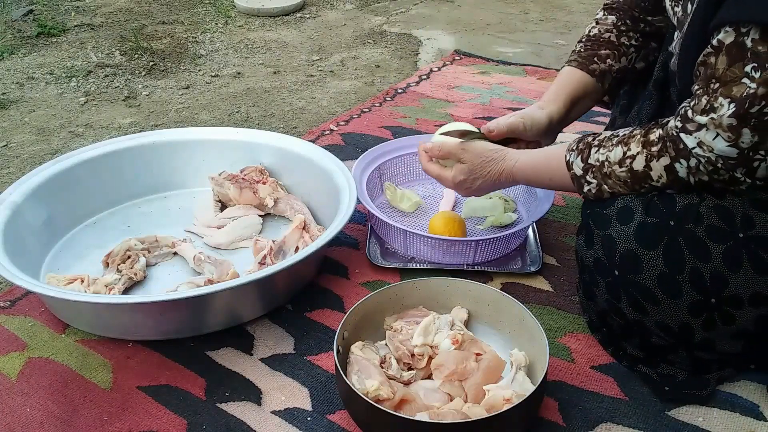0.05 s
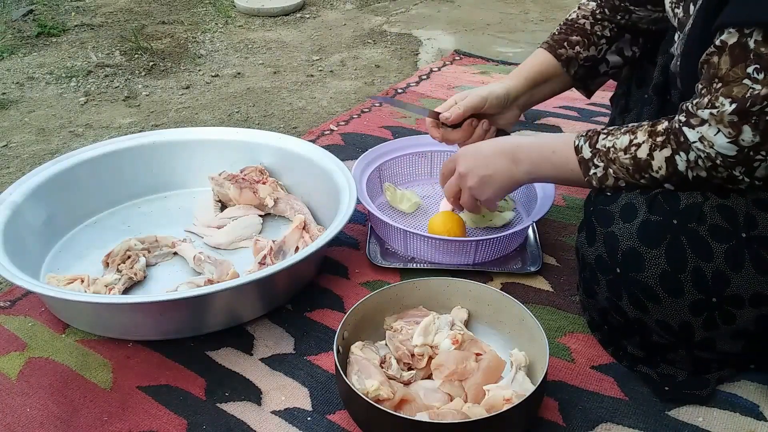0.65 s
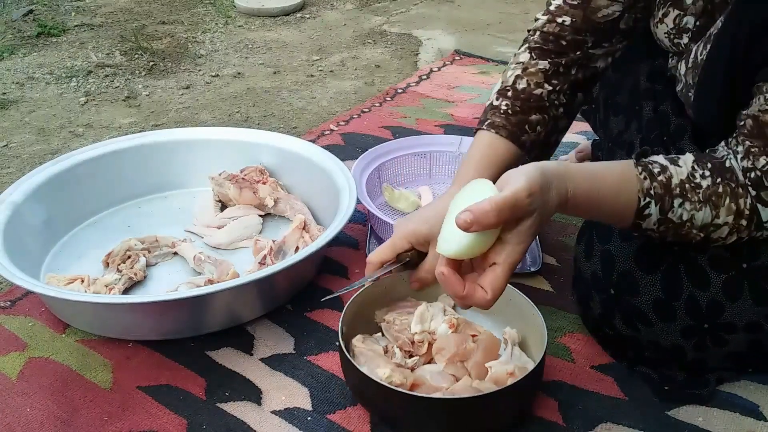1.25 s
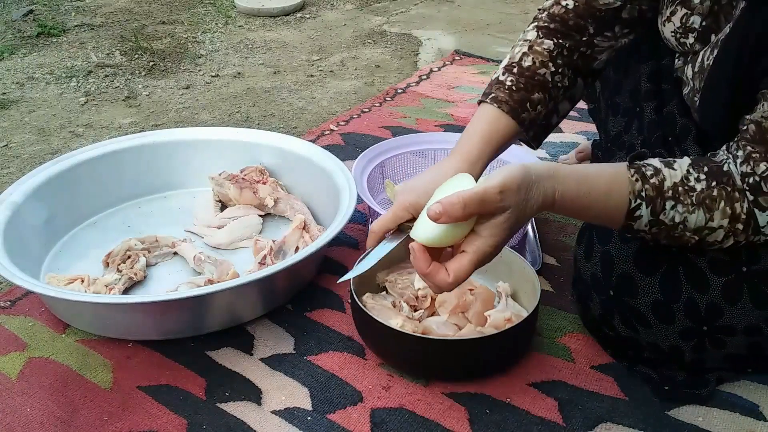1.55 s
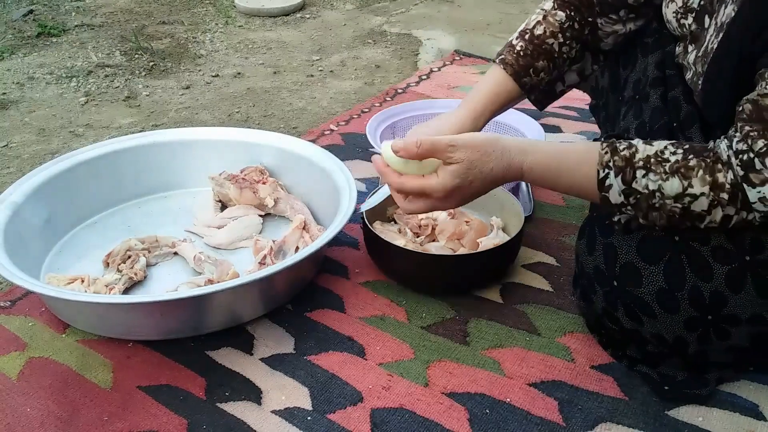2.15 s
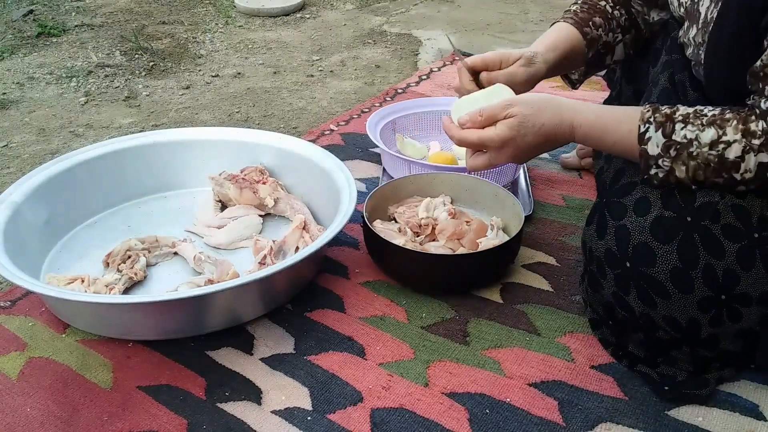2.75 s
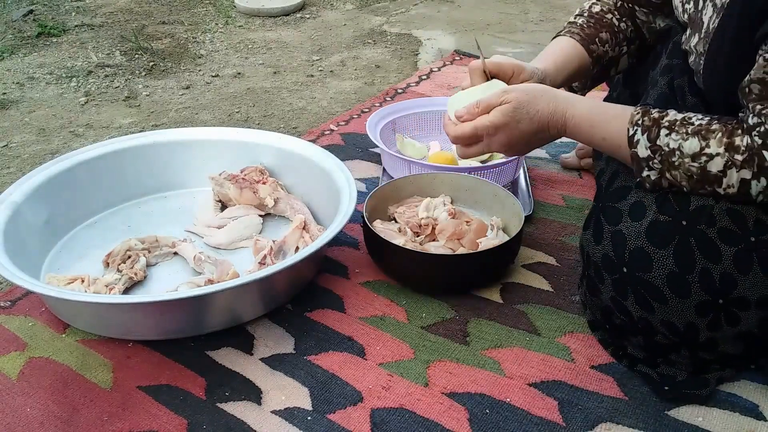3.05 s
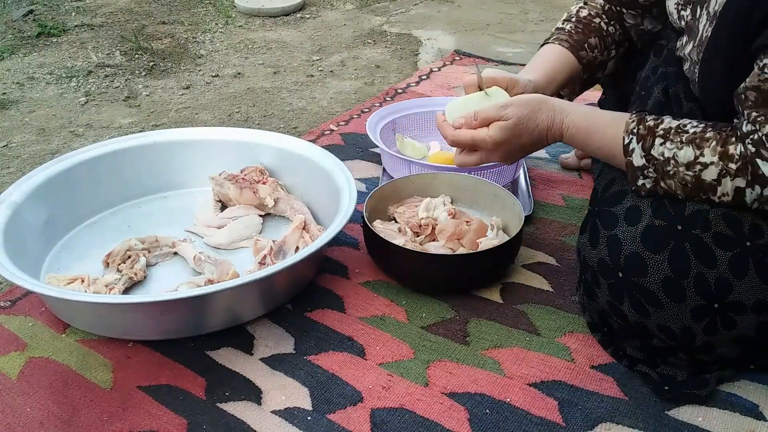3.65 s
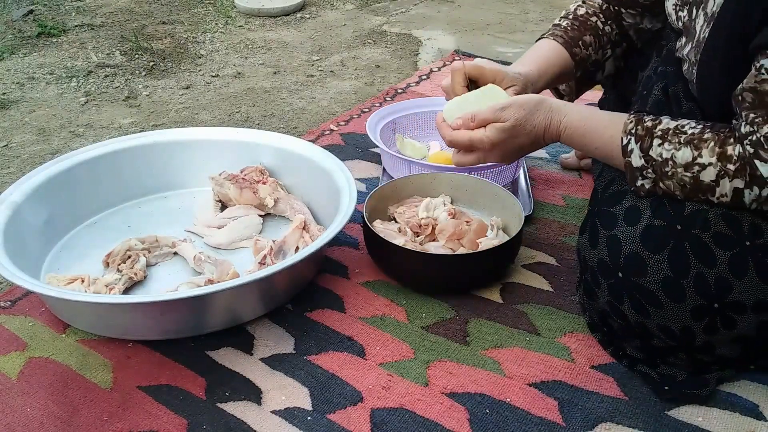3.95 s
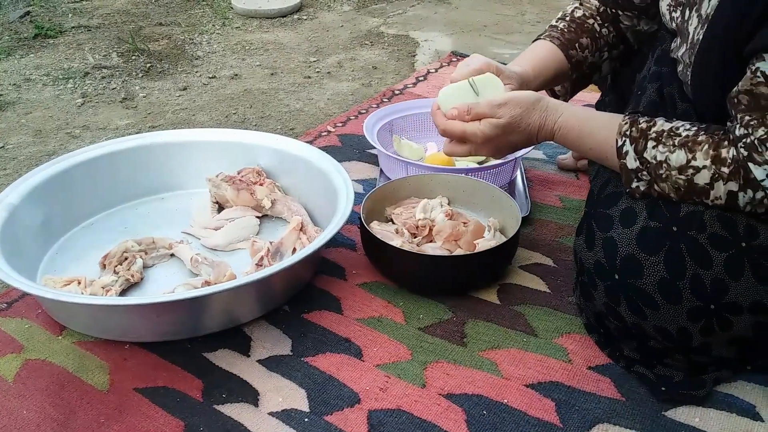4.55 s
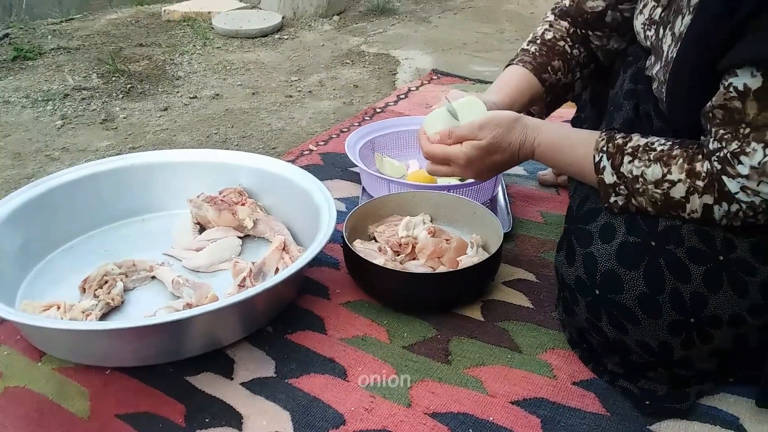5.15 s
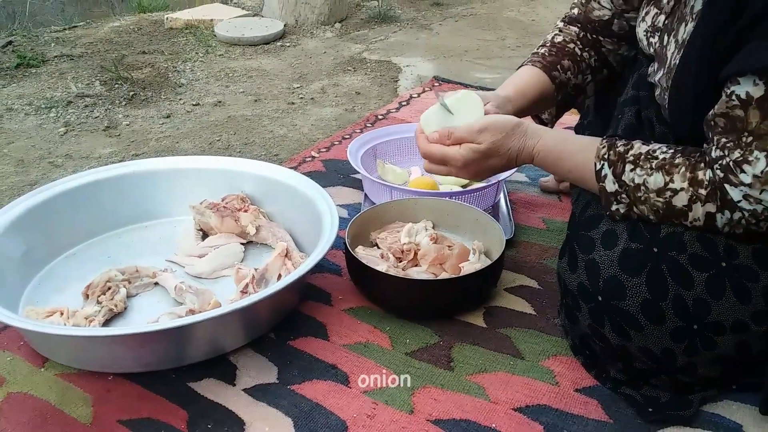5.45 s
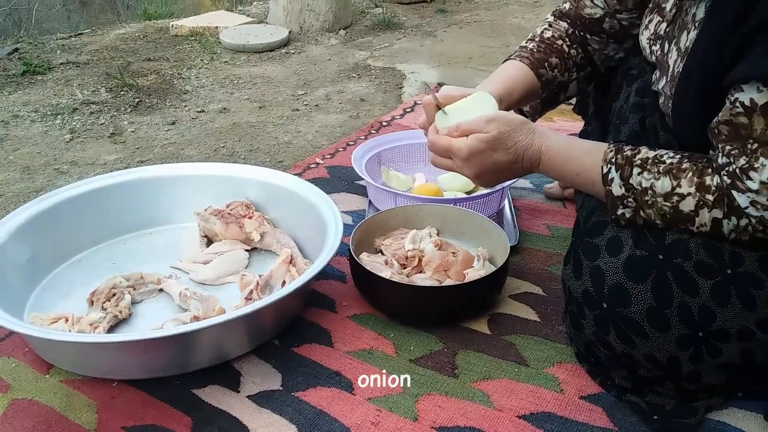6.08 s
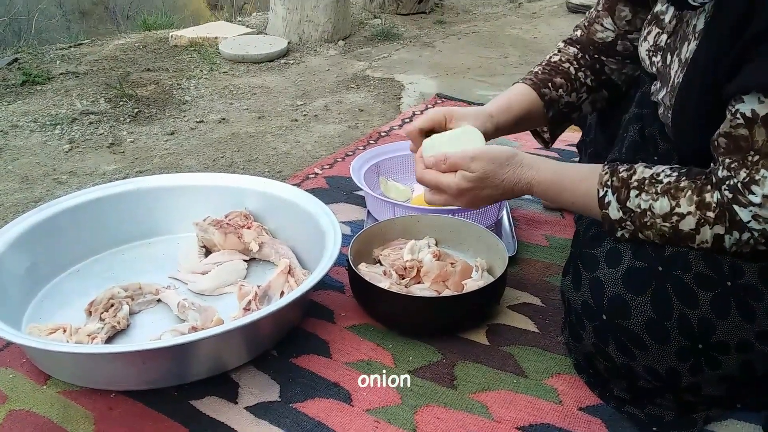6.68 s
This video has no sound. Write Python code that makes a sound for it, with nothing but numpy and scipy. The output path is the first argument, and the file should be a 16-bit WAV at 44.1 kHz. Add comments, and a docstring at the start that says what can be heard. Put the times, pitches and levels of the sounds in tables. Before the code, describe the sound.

The setting is a quiet yard with a faint low murmur of air, a very thin high whine and almost no echo. At about 0.7 seconds, several onion pieces drop into a plastic colander with light, wet, hollow taps. From 1.2 to 2.2 seconds, a loaded pot is dragged over a rug, hissing and rumbling softly, with one dry knock at 1.6 seconds, the loudest sound. Around 2.3 seconds, a knife clatters and skids on the rim of a metal basin, ringing briefly. Then the knife cuts a hand-held onion in five short, crisp, uneven strokes, at about 3.1, 3.6, 4.1, 5.0 and 6.1 seconds. Each is a soft, juicy crunch of layers giving way, the last one a little longer and brighter. Small blade ticks and faint rubbing of fingers fall between the strokes, with a final tick near 6.7 seconds.

```python
"""A knife cuts a hand-held onion in five crisp, lurching strokes: cells burst in crowds as each layer
gives way, and the wet blade rubs and ticks. Before the strokes, pieces drop into a plastic colander,
a loaded pot is dragged over a rug and knocks, and the knife clatters on the metal rim of a basin.
Fracture and friction are modelled as filtered random impulses, ringing bodies as sums of damped modes.
The quiet yard adds a faint echo, a low murmur of air and a thin high whine."""
import sys
import numpy as np
from scipy import signal
from scipy.fft import rfft, irfft
from scipy.io import wavfile

SR = 44100
rng = np.random.default_rng(int(sys.argv[2]) if len(sys.argv) > 2 else 0)


def int16_out(signal):
    """Quantize to a 16-bit WAV file."""
    q = np.round(np.clip(np.atleast_2d(signal).T, -1, 1) * 32767)
    wavfile.write(sys.argv[1], SR, q.astype(np.int16))


N = 305172
T = np.arange(N) / SR

# modes of the basin's rim: pitch_hz, level_db, t60_s
RIM_MODES = [(754, -28, .22), (969, -14, .16), (1034, -5, .11), (1155, -5, .07), (1268, -7, .09),
             (1455, -7, .06), (1554, 0, .155), (1873, -23, .15), (2146, -11, .14), (2254, -14, .13),
             (2429, -4, .1), (2625, -9, .08), (2718, -6, .09), (2972, -6, .08), (3422, -4, .05),
             (3785, -9, .04), (4055, -6, .05), (4107, -6, .05), (4340, -8, .04), (4670, -6, .03),
             (5093, -13, .035), (5480, -11, .04), (6040, -11, .04), (6345, -15, .035), (7560, -19, .03)]
# spectrum of steel meeting the rim: frequency_hz, level_db
STEEL_SPECTRUM = [(200, -27.5), (420, -5), (800, -24.5), (1000, -8.5), (1500, -0.5), (1900, -10),
                  (2700, -4.5), (3600, -2.5), (4500, -3), (5600, -7.5), (7500, -12.5), (9500, -37.5),
                  (12500, -27.5), (16000, -31)]


def onion():
    """Brittle fracture: cells burst loudly at each lurch and on through the glide; wet surfaces rub."""
    # knife strokes: touch_s, first_s, last_s, lurch_count, slowing_ratio, rub_db, first_db, rise_db,
    # full_db, last_db, half_length_s, glide_db, final_brightness_db,
    # then the slit's two resonances: low_hz, low_boost_db, high_hz, high_boost_db
    strokes = [(3.063, 3.07, 3.223, 5, .13, -78, -62.5, 5.2, -49, -44, .0135, -14, -2, 2936, 16, 5990, 3),
               (3.575, 3.581, 3.699, 5, .14, -70, -60.5, 11, -47, -50.5, .014, -13, -4, 3110, 9, 6300, 0),
               (4.0, 4.081, 4.211, 4, .13, -55, -48.5, 4, -44, -37, .0085, -23, -1, 3130, 5.5, 4620, 2),
               (4.922, 4.943, 5.124, 5, .1, -66, -56.5, 4.8, -43, -45, .0105, -23, 5, 1580, 6, 4720, 4),
               (5.932, 6.009, 6.233, 6, .26, -56.5, -57, 5.3, -39, -39.5, .0068, -24, 8, 1977, 11.5, 4370, -1.5)]
    # spectrum of bursting cells: frequency_hz, level_db
    crunch_spectrum = [(300, -20), (900, -32), (1300, -21), (1900, -12), (2400, -9), (3000, -3), (4600, 5),
                       (6300, 3.5), (7700, -5), (9000, -22.5), (10500, -27), (12500, -18), (15500, -13.5)]
    # peaks and dips of the cupped hand: centre_hz, width_hz, boost_db
    hand_peaks = [(2450, 250, -5), (3340, 370, 1), (3880, 340, -8), (4300, 590, 1.5), (5400, 440, -12.5),
                  (6200, 840, 2.5), (6730, 270, -9)]
    # spectrum of rubbing on the onion: frequency_hz, level_db
    rub_spectrum = [(200, -18.5), (500, -4), (780, -24), (1200, 7), (1550, -4), (2050, 11.5), (2550, -4),
                    (3100, -1.5), (4300, 1), (7200, -2), (9000, -41), (15500, -18)]
    # the rubbing's hollow peaks and dips: centre_hz, width_hz, boost_db
    rub_peaks = [(1150, 160, -5.5), (2050, 660, -2), (3000, 190, 11.5), (3580, 300, -3), (4220, 350, 3.5)]
    # fingers shifting on the onion: centre_s, level_db, half_length_s, brightness_db
    finger_shifts = [(0.303, -65.5, 0.015, -25), (0.93, -73.5, 0.051, 17), (2.62, -72.5, 0.09, 23),
                     (3.368, -66, 0.015, 21), (3.885, -73, .042, -19), (4.56, -75, .042, 9.5),
                     (6.631, -63, .025, 30)]
    # the blade set down or breaking through: start_s, level_db, brightness_db, resonance_hz
    blade_taps = [(3.538, -49, 15, 3100), (3.8265, -39.5, 15.5, 6800), (3.8297, -22.5, 9, 900),
                  (4.116, -39.5, -13, 336), (4.4332, -33, 11.5, 258), (4.5242, -39, 3.5, 280),
                  (4.7613, -32, -32, 1283), (5.217, -48, 17, 6090), (5.616, -37.5, 5.5, 481),
                  (5.934, -38.5, -18, 283), (6.573, -46.5, 4.5, 281), (6.7313, -32.5, -1, 3110)]
    # rows of cells give way together, in clumps of a few ms
    bursts = rms_one(grains(per_s=9000, spread_db=1.0) * from_db(1.4 * drift(450)))
    rubbing = convolve(grains(per_s=6000, spread_db=2.5), response(rub_spectrum, rub_peaks))
    blade = rms_one(brighten(rubbing, -17)) * from_db(1.2 * drift(70))
    out = swells(finger_shifts, rubbing) + strikes(blade_taps, tick)
    for (touch_s, first_s, last_s, count, slowing, rub_db, first_db, rise_db, full_db, last_db,
         half_s, glide_db, bright_db, low_hz, low_db, high_hz, high_db) in strokes:
        slit_peaks = [(low_hz, 580, low_db), (high_hz, 600, high_db)]
        cells = convolve(bursts, response(crunch_spectrum, hand_peaks + slit_peaks))
        slips = lurches(first_s, last_s, count, slowing, first_db, rise_db, full_db, last_db,
                        half_s, bright_db)
        force_db = np.interp(T, slips[:, 0], slips[:, 1])
        glide_s = last_s - first_s + 0.026  # the blade follows through after the last lurch
        glide = from_db(force_db + glide_db) * envelope(first_s, glide_s, release_db_per_s=206)
        # the flat of the blade rubs less as the slit opens
        rub = from_db(rub_db) * envelope(touch_s, hold_s=0.059, release_db_per_s=86)
        out += swells(slips, cells, edge_power=3.4, rise_s=0.0061) + glide * cells + rub * blade
    return out


def lurches(first_s, last_s, count, slowing, first_db, rise_db, full_db, last_db,
            half_s, final_bright_db, entry_bright_db=-11.5, stretch=1.36):
    """Stick-slip: the blade breaks layer after layer, each slip longer and brighter as it sinks."""
    layer = np.arange(count)
    depth = layer / layer[-1]
    centre_s = first_s + (last_s - first_s) * depth * (1 - slowing * (1 - depth))
    level_db = np.append(np.minimum(first_db + rise_db * layer[:-1], full_db), last_db)
    half_lengths_s = half_s * stretch ** (depth - .5)
    bright_db = entry_bright_db + (final_bright_db - entry_bright_db) * depth
    return np.column_stack([centre_s, level_db, half_lengths_s, bright_db])


def tick(body_hz, onion_lowest_hz=230):
    """Impulse excitation: a tap of the blade is coloured by the resonance of the part it meets."""
    # spectrum of the tap: frequency_hz, level_db
    tap_spectrum = [(30, -27), (90, -2), (200, 4), (420, 0), (1040, -16.5), (1900, -10.5), (2600, -14),
                    (3500, -11), (4600, -16), (7100, -17.5), (9500, -53), (14000, -40)]
    tap = blow(tap_spectrum, [(body_hz, 0.44 * body_hz, 6)],
               scatter_db=-18.5, scatter_t60=0.02, tail_db=-35, tail_t60=0.21)
    return high_pass(tap, edge_hz=min(0.31 * body_hz, onion_lowest_hz))


def colander(hop_s=0.024, hop_loss_db=11):
    """Inelastic collision: each piece of onion lands and hops twice, weaker each time."""
    # falling pieces: start_s, level_db, brightness_db
    pieces = [(0.7072, -40.5, -26), (0.7245, -33.5, -20), (0.7925, -44, 5), (0.7962, -29.5, 28),
              (0.8162, -37, 0), (0.854, -35, 8), (0.912, -49, 16)]
    contacts = [(start_s + hop_s * hop, level_db - hop_loss_db * hop, bright_db)
                for start_s, level_db, bright_db in pieces for hop in range(3)]
    return strikes(contacts, landing)


def landing():
    """Modal ringing: the wet snap of a piece sets the hollow plastic vibrating."""
    # spectrum of the snap: frequency_hz, level_db
    snap_spectrum = [(100, 0), (250, 9), (480, 13.5), (900, -1), (1450, 3.5), (2400, -4), (3200, 3.5),
                     (5400, 1.5), (7200, -0.5), (9200, -29.5), (15000, -17)]
    # modes of the colander: pitch_hz, level_db, t60_s
    plastic_modes = [(190, -1.5, 0.18), (440, -7, .09), (531, -1, 0.19), (1106, -2, 0.12),
                     (1440, -4.5, 0.2), (1900, -10, 0.11), (3170, 2, 0.086), (3660, 4, 0.035)]
    snap = blow(snap_spectrum, [], scatter_db=-6, scatter_t60=0.022, tail_db=-9, tail_t60=0.1)
    return snap + from_db(-22) * ring(plastic_modes)


def pot():
    """Sliding friction: the base hisses and catches on the rug, sings and rumbles under its load."""
    # the drag before the loudest knock: time_s, friction_db, singing_db, rumble_db
    pull = [(1.12, -83, -98, -78), (1.206, -53, -54.5, -73), (1.29, -43, -42.5, -58),
            (1.336, -42.5, -49.5, -61), (1.428, -44.5, -49.5, -50.5), (1.444, -45.5, -53, -55),
            (1.52, -45, -51, -57.5), (1.572, -44.5, -46.5, -55.5), (1.595, -43, -50.5, -48)]
    # the drag after it: time_s, friction_db, singing_db, rumble_db
    slide = [(1.69, -45.5, -52, -53.5), (1.728, -49.5, -56, -60.5), (1.994, -47, -56, -55),
             (2.074, -49, -53, -61), (2.098, -49.5, -57, -50), (2.18, -53.5, -61.5, -61),
             (2.215, -68, -75.5, -63.5)]
    # hiss of the rug's weave: frequency_hz, level_db
    weave_spectrum = [(500, -22), (900, -11), (1700, -1), (2300, -4), (2620, -4.5), (3200, 3), (4200, -3.5),
                      (5200, -1.5), (7400, -4.5), (8400, -13.5), (9400, -29.5), (10800, -27), (12300, -22),
                      (15500, -25.5)]
    # resonances of the pot's wall: centre_hz, width_hz, boost_db
    wall_peaks = [(1800, 150, 2.5), (3250, 480, -2), (5242, 300, 1.5), (7330, 170, 1.5)]
    # grit catching under the pot: centre_s, level_db, half_length_s, brightness_db
    catches = [(1.345, -47, 0.0075, 0), (1.445, -47, 0.0042, 24), (1.585, -43, 0.0076, -13),
               (1.807, -43.5, 0.0041, -14), (1.962, -49, 0.013, 22), (2.174, -48.5, 0.0063, 2.5)]
    # singing of the base: frequency_hz, level_db
    base_spectrum = [(600, -36.5), (1050, -17.5), (1230, 0.5), (1420, 6.5), (1600, -11), (2400, -41)]
    # rumble of the loaded pot: frequency_hz, level_db
    rumble_spectrum = [(25, -28), (60, -17.5), (130, 1.5), (240, 4), (330, -3.5), (450, 3), (650, -4),
                       (900, -4.5), (1300, -18), (3000, -44.5)]
    # knocks as the pot moves: start_s, level_db, brightness_db
    bumps = [(1.42, -41, -20), (1.6192, -1, -8), (1.652, -30.5, 1.5), (2.104, -33.5, -23.5)]
    time_s, *levels_db = np.transpose(np.vstack([pull, slide]))
    friction, singing, load = (from_db(np.interp(T, time_s, db, left=-120, right=-120))
                               for db in levels_db)
    scrape = response(weave_spectrum, wall_peaks)
    hiss = convolve(grains(per_s=11000, spread_db=1.0), scrape) * from_db(0.8 * drift(90))
    grit = swells(catches, convolve(grains(per_s=2100, spread_db=2.0), scrape))
    base = convolve(rng.standard_normal(N), response(base_spectrum)) * from_db(-1 + 2.4 * drift(25))
    rumble = convolve(grains(per_s=2500, spread_db=1.5), response(rumble_spectrum)) * from_db(-1.5)
    return friction * hiss + grit + singing * base + load * rumble + strikes(bumps, knock)


def knock():
    """Damped vibration: a dry bump excites the pot's modes, which its load soon stills."""
    # spectrum of the bump: frequency_hz, level_db
    bump_spectrum = [(20, -47), (60, -25), (200, -11), (400, -2.5), (580, -0.5), (750, -12.5), (1150, -1.5),
                     (1700, -3.5), (2100, -13.5), (4000, -16.5), (5300, -17.5), (7500, -18), (10000, -37.5),
                     (15000, -34.5)]
    # modes of the loaded pot: pitch_hz, level_db, t60_s
    pot_modes = [(428, -6, .05), (527, -5, .05), (611, -2, .06), (844, -5, .055), (965, -9, .04),
                 (1116, -6, .04), (1221, -1, .065), (1510, -7, .045), (1611, -5, .05), (1775, -10, .04),
                 (2611, -11, .04)]
    bump = blow(bump_spectrum, [], scatter_db=-24, scatter_t60=.042, tail_db=-39, tail_t60=.17)
    return bump + from_db(-14.5) * high_pass(ring(pot_modes), edge_hz=140)


def basin(skid_lag_s=.004, skid_bright_db=2):
    """Impact and friction: the knife bounces on the rim, skids after each blow and grates along it."""
    # knife on the rim: start_s, level_db, brightness_db, hardness_hz, favoured_hz,
    # skid_db, skid_half_length_s
    bounces = [(2.2473, -22, 6.5, 9000, 4670, -24, 0.0025), (2.2494, -18, 5.5, 8050, 2720, -22, 0.0052),
               (2.273, -23, 1, 8000, 4080, -28.5, 0.0028), (2.2938, -17.5, -1, 4040, 2145, -28.5, .016),
               (2.3762, -19.5, 6.5, 2030, 1554, -30, 0.0039),
               (2.3868, -35.5, 18, 3000, 2429, -32.5, 0.0024)]
    # the edge grating along the rim: centre_s, level_db, half_length_s, brightness_db
    scrapes = [(2.365, -32, 0.017, 0.5)]
    grating = convolve(grains(per_s=9900, spread_db=2.0), response(STEEL_SPECTRUM, rim_peaks()))
    blows = [bounce[:5] for bounce in bounces]
    skids = [(start_s + skid_lag_s, skid_db, half_s, skid_bright_db)
             for start_s, *_, skid_db, half_s in bounces]
    return strikes(blows, clang) + swells(skids + scrapes, high_pass(grating, edge_hz=590))


def clang(hardness_hz, favoured_hz, favour_db=6):
    """Modal excitation: the spot struck favours some modes; a soft contact weakens the high ones."""
    crack = blow(STEEL_SPECTRUM, rim_peaks(),
                 scatter_db=-9, scatter_t60=.028, tail_db=-38.5, tail_t60=.05)
    crack = from_db(0.5) * high_pass(crack, edge_hz=750, order=3)
    modes = [(hz, db + favour_db * np.exp(-((hz - favoured_hz) / 110) ** 2), t60)
             for hz, db, t60 in RIM_MODES]
    ringing = from_db(-3) * high_pass(ring(modes), edge_hz=850, order=6)
    contact = signal.butter(2, hardness_hz, fs=SR)
    return signal.lfilter(*contact, ringing + crack)


def rim_peaks(width_hz=45, boost_db=11):
    """Resonance: the rim's modes colour any contact with it."""
    return [(hz, width_hz, boost_db) for hz, _, _ in RIM_MODES]


def yard_echo(x, echo_db, t60, size=22050):
    """Diffuse reflection: walls and ground scatter a thin, dull tail."""
    t = T[:size]
    tail = rng.standard_normal(size) * from_db(-60 * t / t60) * (1 - np.exp(-t / .012))
    tail = signal.lfilter(*signal.butter(1, 6000, fs=SR), tail)
    return from_db(echo_db) * convolve(x, tail / np.linalg.norm(tail))


def yard_air(air_db=-63, whine_hz=15262, whine_db=-73.5):
    """Ambient noise: a low broadband murmur under a thin, nearly steady tone."""
    # spectrum of the still yard: frequency_hz, level_db
    air_spectrum = [(20, -27), (45, -11.5), (80, 3.5), (120, 1.5), (200, -6), (340, -10), (480, -11),
                    (600, -16), (780, -25.5), (1300, -26.5), (2400, -27), (7000, -32), (9000, -36.5),
                    (14400, -34), (15200, -25.5), (16000, -38.5)]
    # broad hums in the air: centre_hz, width_hz, boost_db
    hums = [(112, 30, 2.5), (475, 55, 8), (593.6, 50, 5.5), (1770, 90, 3.5), (2340, 110, 9)]
    air = convolve(rng.standard_normal(N), response(air_spectrum, hums))
    air *= from_db(air_db + 0.44 * drift(5.7))
    whine = np.sqrt(2) * np.sin(2 * np.pi * np.cumsum(whine_hz + 4 * drift(25)) / SR)
    return air + from_db(whine_db + 1.5 * drift(15)) * whine


def grains(per_s, spread_db):
    """Shot noise: tiny random impulses of uneven size; rms 1."""
    sizes = from_db(spread_db * np.minimum(rng.exponential(1, N), 4))
    return rms_one(rng.standard_normal(N) * sizes * (rng.random(N) < per_s / SR))


def swells(rows, texture, edge_power=3.18, rise_s=np.inf):
    """Amplitude modulation: each short slip shapes a texture with a steep-sided bell."""
    out = np.zeros(N)
    for centre_s, level_db, half_s, bright_db in rows:
        span = slice(max(int((centre_s - 4 * half_s) * SR), 0), int((centre_s + 4 * half_s) * SR))
        t = T[span] - centre_s
        width_s = np.where(t < 0, min(rise_s, half_s), half_s)
        bell = np.exp(-.5 * np.abs(t / width_s) ** edge_power)
        out[span] += from_db(level_db) * bell * rms_one(brighten(texture[span], bright_db / 2))
    return out


def strikes(rows, make_sound):
    """Superposition: each row adds a fresh impact of its own strength and brightness."""
    out = np.zeros(N)
    for start_s, level_db, bright_db, *traits in rows:
        plain = make_sound(*traits)
        sound = brighten(plain, bright_db / 2, pivot_hz=2480)
        start = int(start_s * SR)
        sound = (sound * plain.std() / sound.std())[:N - start]
        out[start:start + len(sound)] += from_db(level_db) * sound
    return out


def blow(spectrum, peaks, scatter_db, scatter_t60, tail_db, tail_t60, size=16384):
    """Source and filter: a pulse, scattered after-contacts and a tail drive a body; peak 1."""
    t = T[:size]
    scatter = from_db(scatter_db - 60 * t / scatter_t60)
    tail = from_db(tail_db - 60 * t / tail_t60)
    force = rng.standard_normal(size) * (scatter + tail)
    force[0] = 1
    sound = convolve(force, response(spectrum, peaks))
    return sound / np.abs(sound).max()


def ring(modes, size=16384):
    """Free vibration: a sum of damped sines in alternating signs."""
    t = T[:size]
    return sum((-1) ** k * from_db(db - 60 * t / t60) * np.sin(2 * np.pi * hz * t)
               for k, (hz, db, t60) in enumerate(modes))


def envelope(start_s, hold_s, release_db_per_s, attack_s=0.011):
    """Exponential decay after a quick rise and a hold."""
    t = T - start_s
    return np.clip(t / attack_s, 0, 1) * from_db(-release_db_per_s * np.maximum(t - hold_s, 0))


def response(spectrum, peaks=(), size=4096):
    """Minimum-phase impulse response of unit energy, from a spectrum and its resonances."""
    hz = np.maximum(np.fft.rfftfreq(size, 1 / SR), 1)
    points = np.array(spectrum)
    db = np.interp(np.log(hz), np.log(points[:, 0]), points[:, 1])
    for centre_hz, width_hz, boost_db in peaks:
        db = db + boost_db / (1 + (2 * (hz - centre_hz) / width_hz) ** 2)
    # folding the cepstrum onto positive time makes the response causal
    cepstrum = irfft(np.log(from_db(db)))
    cepstrum[1:size // 2] *= 2
    cepstrum[size // 2 + 1:] = 0
    pulse = irfft(np.exp(rfft(cepstrum)))
    return pulse / np.linalg.norm(pulse)


def brighten(x, bright_db, pivot_hz=3500):
    """Spectral tilt: a harder contact has more treble and less bass."""
    low = signal.lfilter(*signal.butter(1, pivot_hz, fs=SR), x)
    return low * from_db(-bright_db) + (x - low) * from_db(bright_db)


def high_pass(x, edge_hz, order=2):
    """Radiation loss: a small body gives out little below its lowest modes."""
    return signal.sosfilt(signal.butter(order, edge_hz, "high", fs=SR, output="sos"), x)


def drift(rate_hz):
    """Random fluctuation, linear between knots; rms 1."""
    knots = rng.standard_normal(int(T[-1] * rate_hz) + 2)
    return rms_one(np.interp(T * rate_hz, np.arange(len(knots)), knots))


def convolve(x, impulse_response):
    """Linear filtering by an impulse response."""
    return signal.fftconvolve(x, impulse_response)[:len(x)]


def from_db(db):
    """Decibels to amplitude ratio."""
    return 10 ** (np.asarray(db) / 20)


def rms_one(x):
    """Normalisation to rms 1."""
    return x / np.sqrt(np.mean(x ** 2) + 1e-20)


def scene():
    """Superposition of the direct sound, its faint echo and the yard's air."""
    direct = onion() + colander() + pot() + basin()
    return (direct + yard_echo(direct, echo_db=-24, t60=0.15) + yard_air())[None]


def record(dry):
    """Band limiting: a steep low-pass removes the highest treble."""
    cutoff_hz = 15900
    return signal.sosfilt(signal.ellip(10, .1, 70, cutoff_hz, fs=SR, output="sos"), dry)


dry = scene()
out = record(dry)
int16_out(out)
```